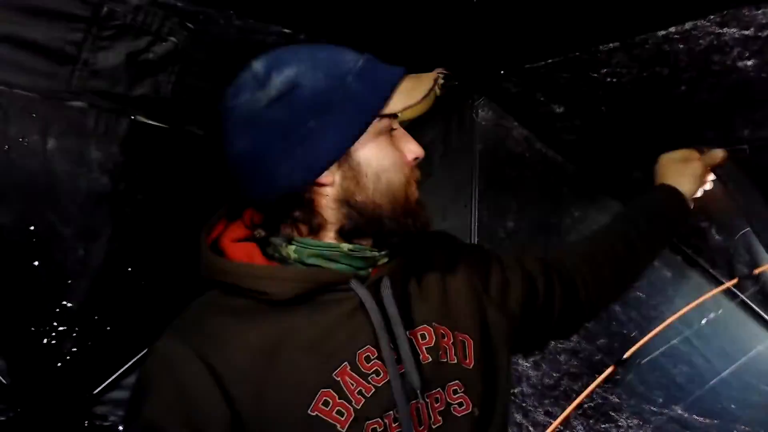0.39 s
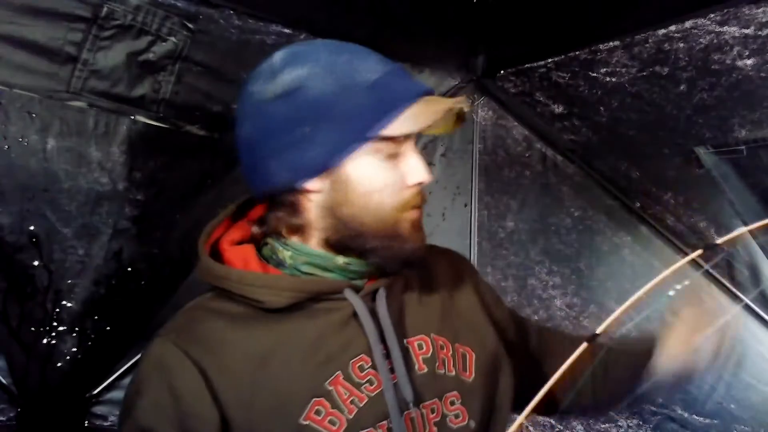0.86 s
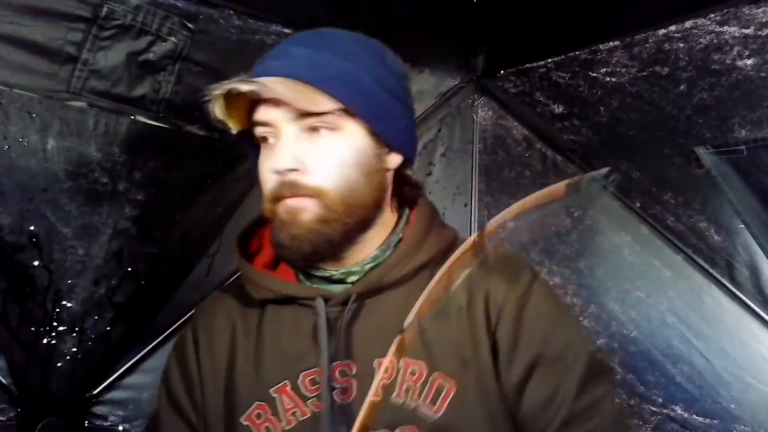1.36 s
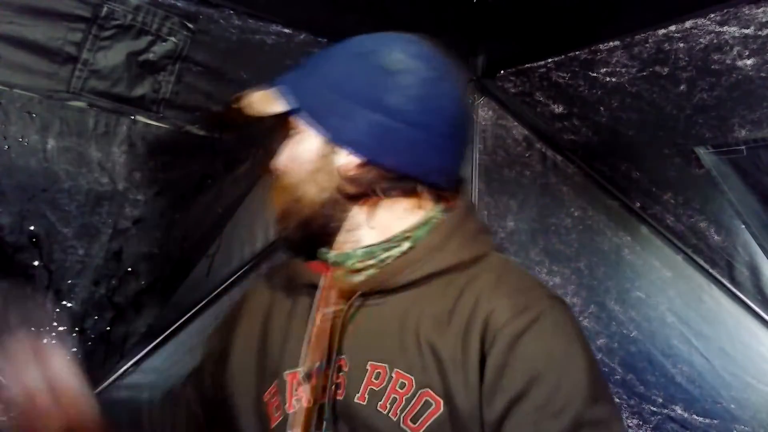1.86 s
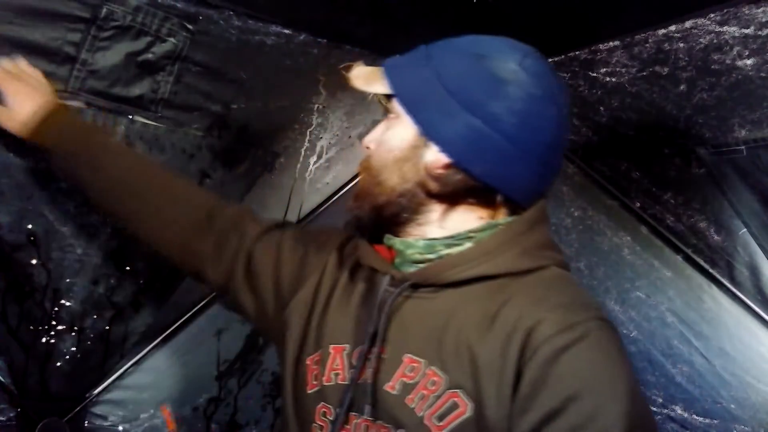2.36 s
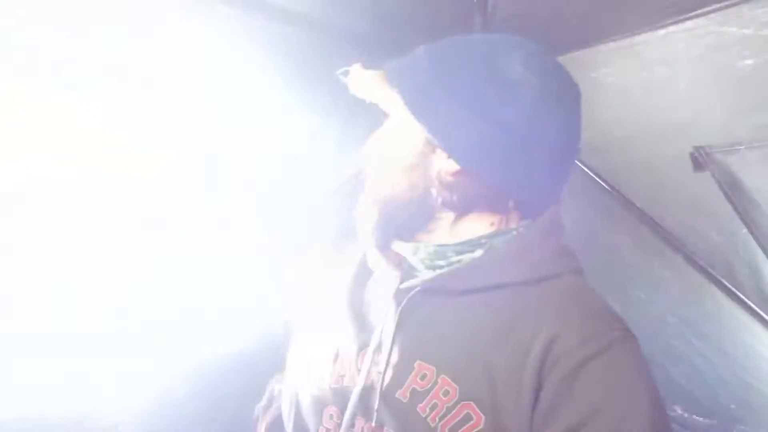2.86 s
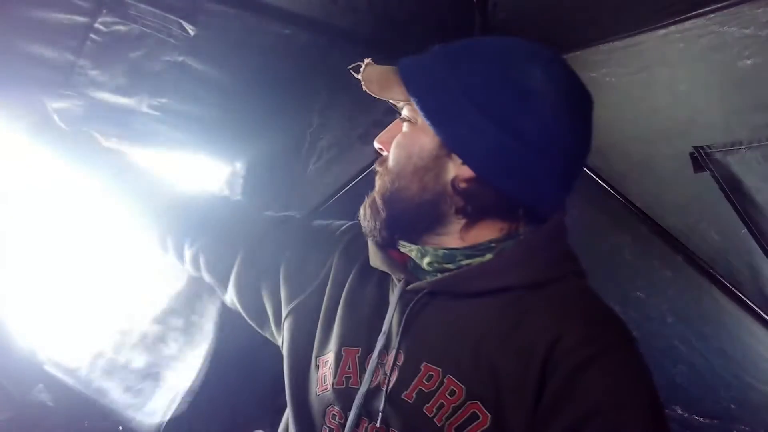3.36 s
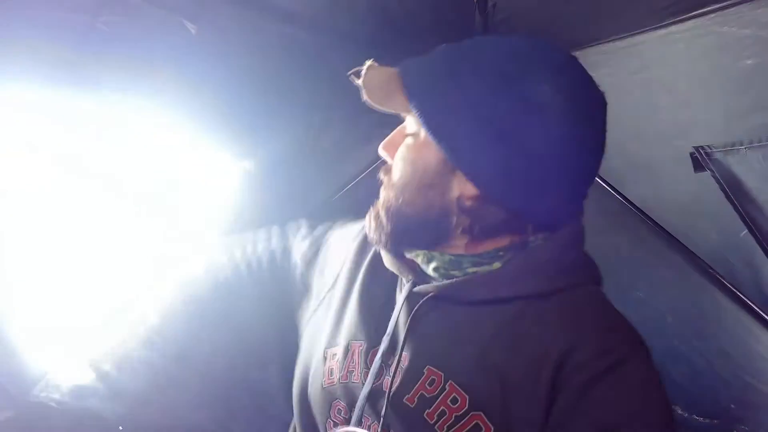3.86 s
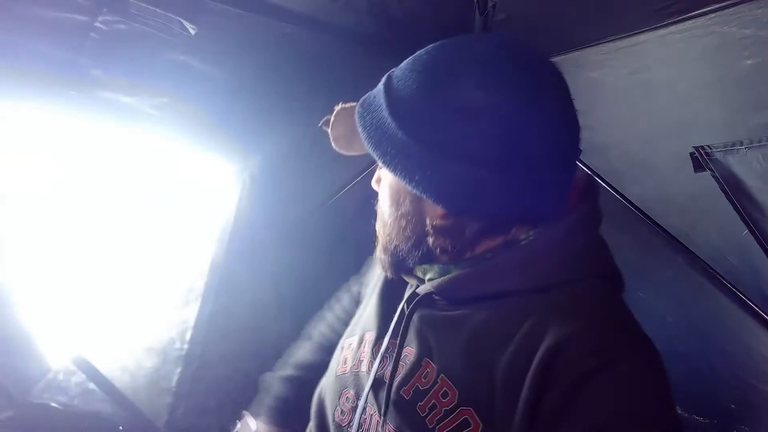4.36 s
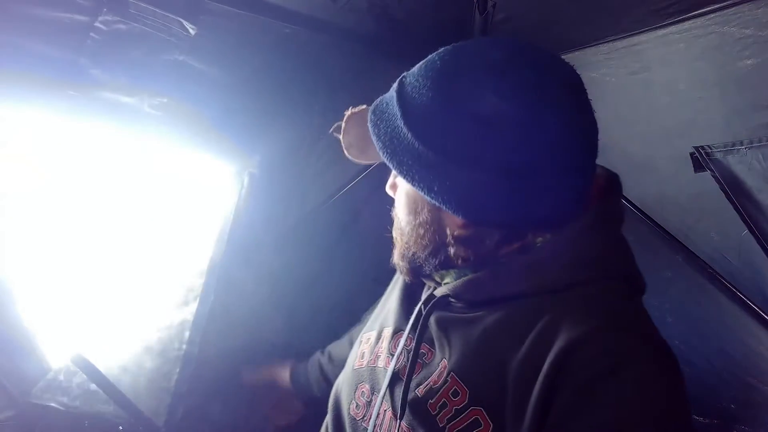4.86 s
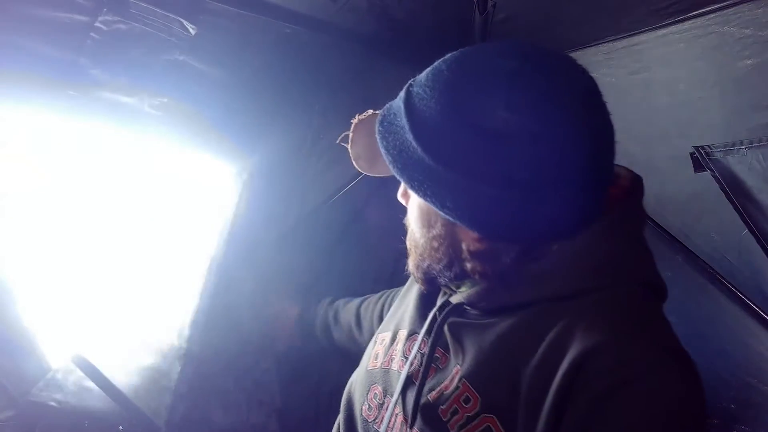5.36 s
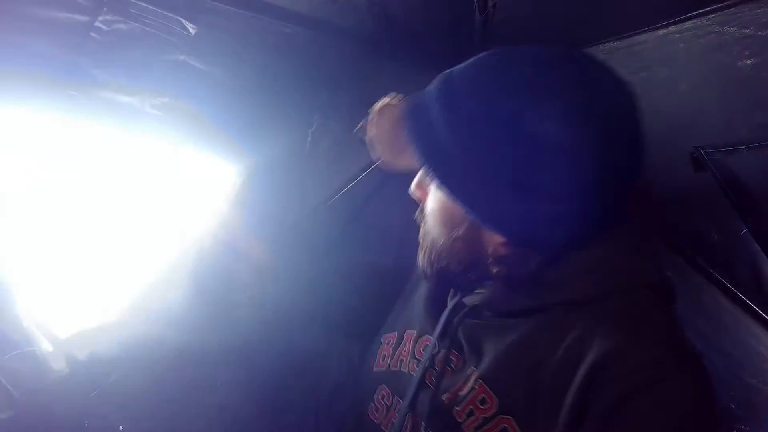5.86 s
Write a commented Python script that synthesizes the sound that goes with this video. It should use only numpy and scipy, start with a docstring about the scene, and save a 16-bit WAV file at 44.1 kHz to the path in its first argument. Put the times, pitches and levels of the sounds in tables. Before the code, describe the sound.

A dry, close sound of stiff coated cloth in a small soft-walled shelter, over a very faint low noise floor. From 0 to 0.5 s there are light, papery brushes and small ticks, then near quiet. Rustling grows from 0.9 s into a dense crumple at 1.2-1.55 s, with hard, woody snaps clustered around 1.4 s. From 1.6 to 2.1 s a thin, flickering hiss slides along a rod with tiny high squeaks, fading to a hush. Small creaks at 2.3-2.4 s lead to another strong crumple peaking near 2.6 s, with pops until 2.85 s. After a pause, one crisp flick comes at 3.3 s. From 3.55 s a flap rips open, swelling with bright crackle and ending in the loudest heavy snaps at 3.94-4.02 s. It drops quickly; after a small rustle at 4.5 s, soft brushing, muffled panel stirs and faint creaks continue, with brighter snaps around 5.55-5.8 s.

```python
"""A hand works the coated cloth wall of a small shelter: it brushes, crumples and rips open a window flap.
Creases buckle as dense random grains, coloured into drumming panels, folds, crinkle, brushing and sheen.
Single folds snap and a thin rod knocks as noise bursts in broad resonances; sliding along the rod is ringing
friction noise. Short squeaks are noise in narrow resonances. Soft walls add a short tail over a faint floor
of noise. The close microphone rounds the loudest peaks."""
import sys
import numpy as np
from scipy import signal
from scipy.fft import rfft, irfft
from scipy.io import wavfile
from scipy.ndimage import uniform_filter1d

SR = 44100
rng = np.random.default_rng(int(sys.argv[2]) if len(sys.argv) > 2 else 0)


def to_wav(s):
    """Save 16-bit WAV."""
    ch = np.atleast_2d(s).T  # columns
    pcm = np.round(np.clip(ch, -1, 1) * 32767)  # PCM
    wavfile.write(sys.argv[1], SR, pcm.astype(np.int16))


def attenuation_scalar(level_db):
    """Turn a level in dB into a linear amplitude multiplier (20 dB per decade)."""
    decades = np.asarray(level_db, float) / 20
    return 10 ** decades


N = 264600

# snaps of single folds and knocks: (time [s], peak level of the ring [dB], pitch [Hz])
SNAP_EVENTS = [(.064, -30.5, 2680), (.107, -29, 2500), (.229, -33, 3470), (.305, -32, 1870),
               (.328, -28, 1750), (.377, -40, 3450), (.621, -42, 3020), (.815, -46.5, 2440),
               (.995, -33, 2540), (1.146, -33, 1380), (1.221, -22, 1740), (1.277, -21.5, 1160),
               (1.377, -5.5, 1100), (1.389, -5, 900), (1.395, -5.5, 1610), (1.422, -10, 1630),
               (1.494, -16.5, 1370), (1.542, -21, 686), (1.625, -19, 1520), (1.706, -19, 1545),
               (2.347, -55, 544), (2.397, -37, 1300), (2.447, -34, 562), (2.478, -22, 1020),
               (2.504, -22, 1110), (2.531, -18.5, 586), (2.56, -12, 520), (2.58, -13, 450),
               (2.623, -14, 3480), (2.713, -19, 1500), (2.754, -16.5, 1050), (2.808, -22, 1300),
               (2.823, -21.5, 2780), (3.235, -34, 641), (3.305, -13, 1080), (3.321, -22.5, 1430),
               (3.535, -16.5, 610), (3.578, -17, 2630), (3.942, -2.5, 1050), (3.982, 2, 1040),
               (4.0, -4, 1050), (4.021, -10, 993), (4.478, -40, 2580), (4.88, -37, 1450), (5.092, -24, 950),
               (5.106, -27, 830), (5.461, -34, 1340), (5.527, -26, 850), (5.56, -20, 610),
               (5.607, -19, 1300), (5.654, -23, 1500), (5.771, -10.5, 2870)]
# the flap is ripped open:
# (time [s], crinkle level [dB], folds over the crinkle [dB], brushing over the crinkle [dB])
FLAP_RIP = [(3.52, -120, 0, 0), (3.54, -31, 3, 3), (3.585, -26, 3, -1.5), (3.65, -21, 2.5, -3),
            (3.72, -17, 5, -4), (3.77, -16, 3, -5), (3.8, -21, 8, .1), (3.832, -19, 7, -3),
            (3.92, -25, 8, 2.5), (3.945, -24, 11, .1), (4.005, -25, 12, -1.5), (4.018, -34, 13, 4),
            (4.035, -42, 5, 4), (4.06, -55, 3, 3), (4.12, -120, 0, 0)]
# slack panels stirring between the gestures: (time [s], drumming level [dB], folds level [dB])
PANEL_STIR = [(0, -74, -72), (.35, -68, -59), (.6, -70, -73), (.8, -78, -85), (1.0, -66, -54),
              (1.2, -79, -62), (1.5, -59, -51), (1.75, -66, -66), (2.0, -65, -73), (2.2, -84, -74),
              (2.27, -72, -72), (2.31, -56, -70), (2.5, -55, -56), (2.87, -51, -66), (3.14, -70, -70),
              (3.3, -52, -57), (3.5, -57, -62), (4.1, -53, -56), (4.3, -53, -65), (4.42, -64, -68),
              (4.53, -50, -57), (4.7, -59, -58), (5.0, -51, -54), (5.4, -60, -50), (5.65, -53, -51),
              (6, -59, -68)]
# sliding along the rod: (time [s], hiss level [dB], upper hiss over the hiss [dB])
ROD_SLIDE = [(1.5, -120, 0), (1.58, -60, -8), (1.66, -43, .1), (1.7, -43, -3), (1.78, -41, -4),
             (1.8, -39, 4), (1.854, -46, -2.5), (1.938, -44, -7), (2.016, -51, -12), (2.05, -64, -12),
             (2.092, -60, -21), (2.2, -83, -5), (2.3, -120, 0)]
ROD_SHARE = 0.75      # share of the sliding power that rings in the rod; the rest brushes the cloth


def rms_one(x):
    """Scale to rms 1."""
    return x / np.sqrt(np.mean(x ** 2) + 1e-20)


def in_time(rows, t=None):
    """Columns of a table after its first, interpolated to one value per sample."""
    s, *columns = np.transpose(rows)
    if t is None:
        t = np.arange(N) / SR
    return [np.interp(t, s, column) for column in columns]


def coloured(x, spectrum):
    """Weight the frequencies of x by a spectrum, then scale to rms 1."""
    hz, db = np.transpose(spectrum)
    bins_hz = np.linspace(1, SR / 2, N // 2 + 1)
    gain_db = np.interp(np.log(bins_hz), np.log(hz), db, left=-90, right=-90)
    return rms_one(irfft(rfft(x) * attenuation_scalar(gain_db), N))


def drift(rate):
    """Slow random wander of rms 1: noise through two equal low-pass poles at rate Hz."""
    r = np.exp(-2 * np.pi * rate / SR)
    noise = rng.standard_normal(N + SR)
    return rms_one(signal.lfilter([1], [1, -2 * r, r * r], noise)[SR:])


def resonance(x, hz, width_hz):
    """Two-pole band-pass with gain 1 on top."""
    r = np.exp(-np.pi * width_hz / SR)
    zeros = [(1 - r * r) / 2, 0, (r * r - 1) / 2]
    poles = [1, -2 * r * np.cos(2 * np.pi * hz / SR), r * r]
    return signal.lfilter(zeros, poles, x)


def sticking_time():
    """A clock for the cloth that stands still just before each snap, then jumps ahead."""
    hold_s = 0.015      # the cloth sticks this long before a snap lets it go
    t = np.arange(N) / SR
    held = t.copy()
    for s, *rest in SNAP_EVENTS:
        before = (t > s - hold_s) & (t < s)
        held[before] = s - hold_s
    return uniform_filter1d(held, size=60)      # the release takes about a millisecond


def gestures(rows, clock, extra_db):
    """Power of a layer: each gesture swells, fades and settles; extra_db turns the last column into dB."""
    swell_power = 1.40      # amplitude grows as this power of the time since the gesture began
    settle_db, settle_db_per_s = -33, 100      # settling starts this far below and fades this fast
    power = np.zeros(N)
    for s, swell, fade, db, colour_db in rows:
        near = slice(max(int((s - 0.6) * SR), 0), int((s + 0.9) * SR))
        t = clock[near] - s
        grown = np.clip(1 + t / swell, 0, 1)
        main = grown ** (2 * swell_power) * attenuation_scalar(-40 * np.maximum(t, 0) / fade)
        settling = attenuation_scalar(2 * (settle_db - settle_db_per_s * t)) * (t > 0)
        power[near] += attenuation_scalar(2 * (db + extra_db(colour_db))) * (main + settling)
    return power


def creases(clump_db, clump_rate, ring_db, cycles):
    """Tiny buckles at random moments, of varied size, in clumps; each also rings in a small patch of cloth."""
    # how grainy the creases sound: (time [s], spread of grain sizes [dB])
    grain_spread = [(0, 2), (1.2, -0.5), (1.5, 2.5), (2.2, 2), (2.6, 3.5), (3.2, -3.5), (3.55, 4.2),
                    (4.0, 4.2), (4.4, -4.5), (6, -1)]
    grains_per_s = 6000
    spread_db, = in_time(grain_spread)
    sizes = attenuation_scalar(spread_db * np.minimum(rng.exponential(1, N), 5)) * rng.choice([-1, 1], N)
    buckles = sizes * (rng.random(N) < grains_per_s / SR) * attenuation_scalar(clump_db * drift(clump_rate))
    pitches = np.geomspace(300, 13000, num=28)
    patch = rng.integers(0, len(pitches), N // 96 + 1).repeat(96)[:N]      # one patch speaks for two ms
    rings = np.zeros(N)
    for k, hz in enumerate(pitches):
        rings += resonance(buckles * (patch == k) + 1e-18, hz, hz / cycles)
    grains = buckles + attenuation_scalar(ring_db) * rings
    return grains / np.sqrt(uniform_filter1d(grains ** 2, size=4000) + 1e-9)      # level evened over 90 ms


def crumpling(clock, coarse, fine):
    """Crumples buckle creases into crinkle and folds, the rip into crinkle; the taut panels drum below."""
    # crumples of the cloth: (peak time [s], swell [s], fade per 20 dB [s], crinkle level [dB],
    # weight = folds over the crinkle [dB])
    crumples = [(0.018, 0.174, 0.085, -65.0, -0.5), (0.071, 0.037, 0.104, -48.5, -17.5),
                (0.108, 0.03, 0.134, -52.5, -10.0), (0.219, 0.109, 0.061, -50.0, -10.0),
                (0.288, 0.122, 0.144, -46.0, -28.0), (0.343, 0.052, 0.054, -44.5, -15.5),
                (0.383, 0.047, 0.13, -45.0, -15.0), (0.587, 0.02, 0.106, -58.0, -26.5),
                (0.622, 0.028, 0.035, -61.0, -11.0), (0.823, 0.034, 0.133, -52.0, -14.5),
                (0.89, 0.096, 0.063, -37.0, -11.0), (1.014, 0.039, 0.079, -36.5, -19.5),
                (1.048, 0.053, 0.051, -35.0, -9.0), (1.152, 0.063, 0.106, -48.0, -19.0),
                (1.229, 0.036, 0.126, -44.0, 0.0), (1.293, 0.038, 0.122, -28.0, -0.5),
                (1.326, 0.069, 0.081, -24.5, -1.0), (1.381, 0.077, 0.074, -32.0, -4.0),
                (1.426, 0.159, 0.044, -29.0, 2.5), (1.496, 0.018, 0.081, -35.0, -3.0),
                (1.539, 0.036, 0.09, -38.5, 3.0), (1.63, 0.02, 0.06, -48.0, 3.0),
                (1.705, 0.02, 0.1, -47.0, 2.0), (2.307, 0.045, 0.096, -63.5, 7.0),
                (2.405, 0.02, 0.05, -46.0, -4.0), (2.45, 0.016, 0.027, -40.5, -26.5),
                (2.482, 0.03, 0.2, -43.0, 1.5), (2.577, 0.06, 0.056, -20.0, 3.5),
                (2.636, 0.096, 0.034, -29.0, 1.5), (2.715, 0.008, 0.035, -32.0, 3.0),
                (2.759, 0.008, 0.04, -30.0, 3.0), (2.811, 0.012, 0.13, -46.0, 1.5),
                (3.237, 0.06, 0.12, -57.0, 5.0), (3.307, 0.015, 0.062, -32.5, 3.5),
                (3.471, 0.085, 0.272, -61.5, -0.5), (4.067, 0.067, 0.065, -43.0, 2.5),
                (4.161, 0.122, 0.264, -61.5, -1.5), (4.491, 0.016, 0.11, -46.0, -2.0),
                (4.685, 0.067, 0.13, -55.5, 3.5), (4.799, 0.159, 0.087, -47.5, 0.5),
                (4.9, 0.052, 0.097, -44.0, 1.5), (5.049, 0.075, 0.1, -51.5, -7.0),
                (5.092, 0.012, 0.04, -42.0, 6.0), (5.259, 0.102, 0.089, -43.5, -5.0),
                (5.396, 0.139, 0.058, -42.0, -9.5), (5.474, 0.036, 0.096, -50.0, -0.5),
                (5.536, 0.052, 0.078, -50.0, -1.5), (5.566, 0.012, 0.056, -33.0, 5.0),
                (5.608, 0.069, 0.061, -40.5, -3.5), (5.659, 0.024, 0.056, -41.0, -5.5),
                (5.741, 0.046, 0.076, -46.5, -4.5), (5.772, 0.008, 0.04, -32.0, 3.0),
                (5.908, 0.147, 0.121, -54.0, 3.5)]
    # colours of panels, folds and crinkle: (frequency [Hz], density [dB per Hz])
    drum_colour = [(40, -42), (100, -26), (200, -7), (330, -5), (450, -9.5), (700, -24)]
    fold_colour = [(300, -26.5), (480, -17.5), (650, 3.5), (780, -1), (1000, 1), (1270, 1), (1500, -1),
                   (2200, -21.5)]
    crinkle_colour = [(900, -39), (1400, -14), (1800, 3), (2100, 3), (2700, 5.5), (3200, 0.5),
                      (4500, -19.5)]
    drum_db, drum_per_weight = -5.0, 1.40      # drumming over the crinkle, more the heavier the crumple
    rip_drum_db = -1.5      # over the crinkle of the rip
    rip_db = in_time(FLAP_RIP, clock)[0]
    stir_drum_db = in_time(PANEL_STIR)[0]
    crinkle = gestures(crumples, clock, lambda weight: 0) + attenuation_scalar(2 * rip_db)
    folds = gestures(crumples, clock, lambda weight: weight)
    drum = gestures(crumples, clock, lambda weight: drum_db + drum_per_weight * min(weight, 5.0))
    drum = drum + attenuation_scalar(2 * (rip_db + rip_drum_db)) + attenuation_scalar(2 * stir_drum_db)
    low = np.sqrt(drum) * coloured(coarse, drum_colour) + np.sqrt(folds) * coloured(coarse, fold_colour)
    return low + np.sqrt(crinkle) * coloured(coarse + fine, crinkle_colour)


def brushing(clock, fine):
    """Fine grains of the coating under brushes, the rip and part of the slide, with a sheen on top."""
    # brushes over the coating: (peak time [s], swell [s], fade per 20 dB [s], brushing level [dB],
    # sheen over the brushing [dB])
    brushes = [(0.02, 0.105, 0.05, -59.0, -21.5), (0.069, 0.035, 0.174, -47.5, -29.0),
               (0.159, 0.186, 0.355, -55.5, -50.0), (0.261, 0.087, 0.093, -42.5, -23.5),
               (0.342, 0.08, 0.117, -37.0, -27.0), (0.407, 0.051, 0.112, -39.0, -16.0),
               (0.619, 0.023, 0.073, -55.5, -39.5), (0.84, 0.05, 0.179, -48.5, -52.0),
               (0.905, 0.053, 0.056, -36.0, -18.5), (1.011, 0.037, 0.142, -37.0, -16.0),
               (1.048, 0.052, 0.044, -29.0, -18.0), (1.149, 0.029, 0.091, -44.0, -27.0),
               (1.224, 0.016, 0.074, -42.0, -28.5), (1.294, 0.035, 0.193, -31.5, -16.5),
               (1.359, 0.102, 0.102, -26.0, -12.5), (1.428, 0.187, 0.044, -42.0, -4.0),
               (1.524, 0.033, 0.267, -41.0, -13.5), (2.3, 0.142, 0.345, -59.0, -52.5),
               (2.411, 0.062, 0.382, -49.0, -52.5), (2.5, 0.048, 0.164, -42.0, -13.5),
               (2.576, 0.061, 0.071, -20.5, -11.5), (2.633, 0.092, 0.039, -26.0, -20.5),
               (2.718, 0.014, 0.048, -33.5, -20.5), (2.757, 0.019, 0.109, -34.0, -13.0),
               (2.816, 0.022, 0.273, -54.5, -21.5), (3.237, 0.063, 0.115, -56.5, -50.0),
               (3.314, 0.022, 0.049, -25.0, -15.0), (3.392, 0.057, 0.107, -52.0, -13.0),
               (3.47, 0.021, 0.414, -51.0, -52.5), (4.069, 0.052, 0.059, -38.0, -13.0),
               (4.15, 0.072, 0.249, -64.0, -9.5), (4.486, 0.012, 0.11, -41.5, -14.5),
               (4.691, 0.076, 0.164, -46.0, -17.5), (4.806, 0.149, 0.061, -38.0, -13.5),
               (4.891, 0.033, 0.082, -41.5, -11.0), (5.05, 0.083, 0.166, -49.5, -20.0),
               (5.105, 0.063, 0.056, -41.0, -22.0), (5.252, 0.119, 0.145, -44.0, -27.5),
               (5.387, 0.118, 0.086, -38.0, -21.5), (5.474, 0.048, 0.057, -47.5, -29.0),
               (5.539, 0.064, 0.128, -52.5, -37.5), (5.572, 0.02, 0.038, -32.5, -20.0),
               (5.61, 0.072, 0.056, -39.5, -13.5), (5.653, 0.046, 0.252, -44.5, -23.5),
               (5.777, 0.026, 0.124, -34.0, -18.0), (5.82, 0.113, 0.207, -56.5, -10.5)]
    # colours of brushing and sheen: (frequency [Hz], density [dB per Hz])
    brush_colour = [(1900, -20.5), (2800, -7.5), (3500, 4.5), (4200, 4), (5200, -4), (6500, -11),
                    (9000, -43)]
    sheen_colour = [(4500, -9), (6500, -4), (9000, -4), (12000, -13.5), (15000, -22), (16000, -42.5)]
    rip_sheen_db = -10.5      # over the brushing of the rip
    rip_db, _, rip_over_db = in_time(FLAP_RIP, clock)
    rip_brush_db = rip_db + rip_over_db
    slide_db, upper_db = in_time(ROD_SLIDE)
    brush = gestures(brushes, clock, lambda sheen: 0) + attenuation_scalar(2 * rip_brush_db)
    brush = brush + (1 - ROD_SHARE) * attenuation_scalar(2 * slide_db)
    sheen = gestures(brushes, clock, lambda sheen: sheen) + attenuation_scalar(2 * (rip_brush_db + rip_sheen_db))
    sheen = sheen + (1 - ROD_SHARE) * attenuation_scalar(2 * (slide_db + upper_db))
    return np.sqrt(brush) * coloured(fine, brush_colour) + np.sqrt(sheen) * coloured(fine, sheen_colour)


def slack_folds(fine):
    """Slack cloth stirs between the gestures: fine grains in a dull colour."""
    # dull folds of slack cloth: (frequency [Hz], density [dB per Hz])
    slack_colour = [(350, -22), (600, -2.5), (850, .1), (1100, -9), (1600, -24), (2200, -40)]
    stir_fold_db = in_time(PANEL_STIR)[1]
    return attenuation_scalar(stir_fold_db) * coloured(fine, slack_colour)


def floor_noise():
    """Faint steady noise, strongest in the deep bass."""
    # colour of the floor: (frequency [Hz], density [dB per Hz])
    floor_colour = [(18, -8), (30, 0), (240, -8), (415, -15.5), (800, -11), (1150, -30), (2000, -36),
                    (3880, -32), (8250, -47), (15000, -42)]
    return attenuation_scalar(-77) * coloured(rng.standard_normal(N), floor_colour)


def shelter(x):
    """Soft walls close by: a short diffuse tail of decaying noise with unit energy."""
    t60_s = 0.098
    t = np.arange(SR // 4) / SR
    tail = rng.standard_normal(len(t)) * attenuation_scalar(-60 * t / t60_s) * (t > 0.003)
    return signal.fftconvolve(x, tail / np.sqrt(np.sum(tail ** 2)))[:N]


def snaps():
    """Each snap or knock: a blow and dying rattle in a broad ring, a push on the panel and a bright crack."""
    ring_t60_s, blow_s = 0.044, 0.0021      # decay of the rattle; moment and half width of the blow
    thump_db, crack_db = -18, -16.5      # low thump and bright crack, relative to the ring's peak
    out, t = np.zeros(N + 8000), np.arange(8000) / SR
    bright = signal.butter(3, [2500, 6000], "band", fs=SR, output="sos")
    rattle = np.minimum(t / 0.0006, 1) * attenuation_scalar(-60 * t / ring_t60_s)
    blow = np.exp(-((t - blow_s) / blow_s) ** 2)
    thump = np.sin(2 * np.pi * 300 * t) * np.minimum(t / 0.0024, 1) * attenuation_scalar(-60 * t / 0.016)
    for s, peak_db, hz in SNAP_EVENTS:
        noise = rng.standard_normal((2, len(t)))
        ringing = noise[0] * (rattle + 1.6 * blow)
        for width in (0.63, 1.2, 0.91):      # soft cloth: little sound far from the pitch
            ringing = resonance(ringing, hz, width * hz)
        crack = signal.sosfilt(bright, noise[1] * (rattle + 0.38 * blow))
        parts = ringing / abs(ringing).max() + attenuation_scalar(crack_db) * crack / abs(crack).max()
        parts = parts + attenuation_scalar(thump_db) * thump
        at = round(s * SR)
        out[at:at + len(t)] += attenuation_scalar(peak_db) * parts
    soft = signal.butter(2, 6500.0, fs=SR, output="sos")      # cloth is soft: no glassy top
    return signal.sosfilt(soft, out[:N])


def rod(friction, modes):
    """Friction noise ringing in the rod's resonances, each wavering by itself."""
    ringing = np.zeros(N)
    for k, (hz, width_hz, db) in enumerate(modes):
        waver_db = 2.5 * drift(15)
        tone = resonance(friction, hz, width_hz) / np.sqrt(width_hz)
        ringing += (-1) ** k * attenuation_scalar(db + waver_db) * tone      # alternating sign from mode to mode
    return rms_one(ringing)


def sliding():
    """Flickering friction along the thin rod: a ringing hiss from its lower and upper resonances."""
    # the rod's lower and upper resonances: (frequency [Hz], width [Hz], level [dB])
    rod_low = [(3300, 180, -2.5), (3700, 180, 0), (5050, 500, -6), (5800, 250, 7.5)]
    rod_high = [(8100, 460, 0), (8900, 540, -7.5), (11000, 520, 9), (12360, 520, -10)]
    slide_db, upper_db = in_time(ROD_SLIDE)
    friction = rng.standard_normal(N) * attenuation_scalar(2.5 * drift(25))
    hiss = rod(friction, rod_low) + attenuation_scalar(upper_db) * rod(friction, rod_high)
    return np.sqrt(ROD_SHARE) * attenuation_scalar(slide_db) * hiss


def squeaks():
    """Squeaks and creaks of rubbing: noise twice through a resonance, starting sharply and cut short."""
    # squeaks and creaks: (time [s], stroke length [s], peak level [dB], pitch [Hz], width [Hz])
    squeak_events = [(1.767, 0.053, -30.5, 3300, 90), (1.87, 0.029, -33.5, 3700, 200),
                     (1.978, 0.033, -44, 6100, 400), (2.09, 0.036, -50.5, 5800, 700),
                     (2.286, 0.038, -42.5, 433, 148), (2.348, 0.036, -43, 332, 149),
                     (2.388, 0.024, -32, 603, 198.6), (2.394, 0.048, -33, 1297, 257.5),
                     (3.217, 0.064, -38, 1160, 247), (3.226, 0.062, -36.5, 630, 200),
                     (4.747, 0.055, -36.5, 1005, 80), (5.336, 0.12, -38.5, 710, 150),
                     (5.456, 0.042, -38.5, 1300, 200), (5.798, 0.064, -39.5, 890, 302)]
    out = np.zeros(N)
    t = np.arange(4000) / SR      # no squeak outlasts 91 ms
    for s, length, peak_db, hz, width_hz in squeak_events:
        stroke = np.clip(t / 0.0023, 0, 1) * np.clip((length - t) / 0.022, 0, 1)
        rubbing = rng.standard_normal(len(t)) * stroke
        tone = resonance(resonance(rubbing, hz, width_hz), hz, 2 * width_hz)
        at = round(s * SR)
        out[at:at + len(t)] += attenuation_scalar(peak_db) * tone / abs(tone).max()
    return out


def flap_folds(clock, coarse):
    """Folds of the taut flap as it is ripped open: coarse grains in the flap's own colour."""
    # folds of the taut flap: (frequency [Hz], density [dB per Hz])
    flap_colour = [(300, -26), (480, -17), (650, -3), (830, -5), (1100, 3), (1350, .5), (1600, -7),
                   (2200, -22)]
    rip_db, fold_over_db, _ = in_time(FLAP_RIP, clock)
    return attenuation_scalar(rip_db + fold_over_db) * coloured(coarse, flap_colour)


def cloth():
    """Two grain trains shared among the layers, so that neighbouring layers flicker together."""
    clock = sticking_time()
    coarse = creases(clump_db=-0.5, clump_rate=71, ring_db=11.5, cycles=8.9)
    fine = creases(clump_db=1.5, clump_rate=16, ring_db=8.0, cycles=59.0)
    worked = crumpling(clock, coarse, fine) + brushing(clock, fine)
    return worked + slack_folds(fine) + flap_folds(clock, coarse)


def scene():
    """Cloth, snaps and knocks, sliding and squeaks in the shelter over a faint floor."""
    near = cloth() + snaps() + sliding() + squeaks()
    return (near + attenuation_scalar(-14) * shelter(near) + floor_noise())[None]


def band_limit(x):
    """A steep low-pass at the top of the band."""
    return signal.sosfilt(signal.butter(12, 15680, fs=SR, output="sos"), x)


def record(dry):
    """The microphone drops the deep bass and rounds peaks near full scale."""
    thin = signal.sosfilt(signal.butter(3, 80.0, "high", fs=SR, output="sos"), dry)
    rounded = 0.97 * thin / (1 + np.abs(thin) ** 4) ** 0.25
    return band_limit(rounded)


dry = scene()
out = record(dry)
to_wav(out)
```